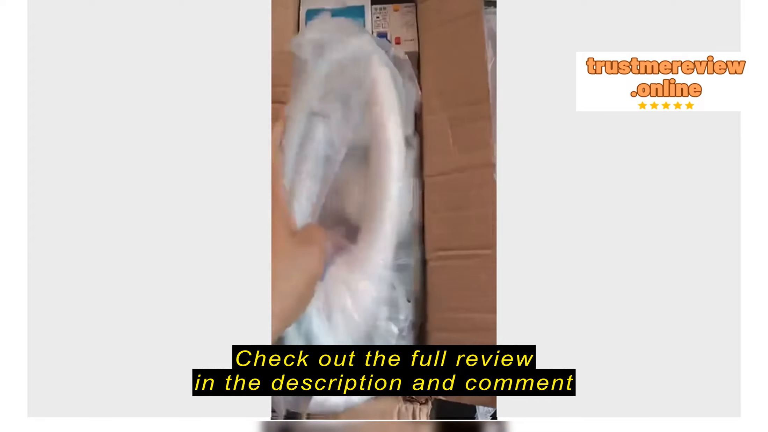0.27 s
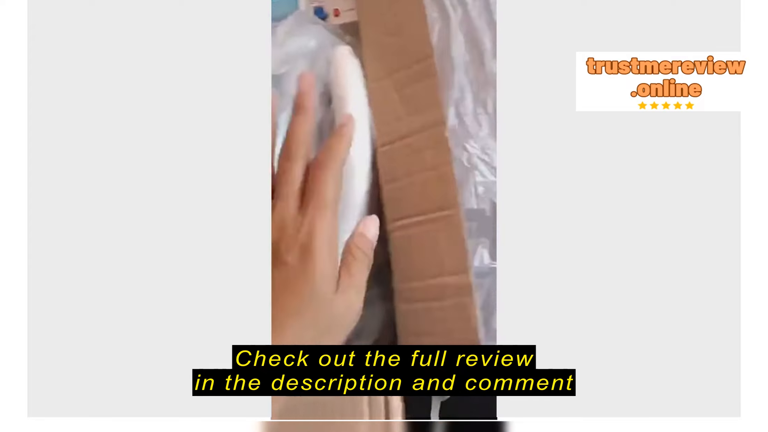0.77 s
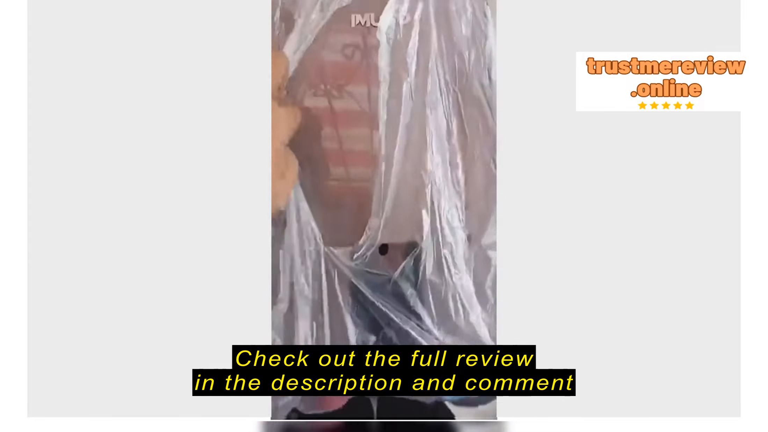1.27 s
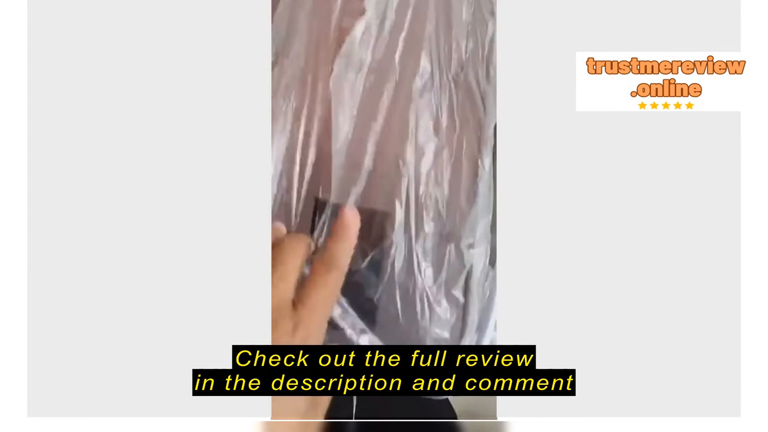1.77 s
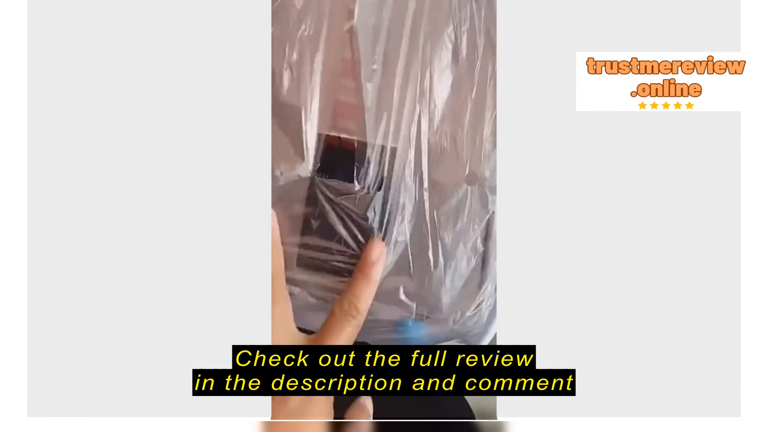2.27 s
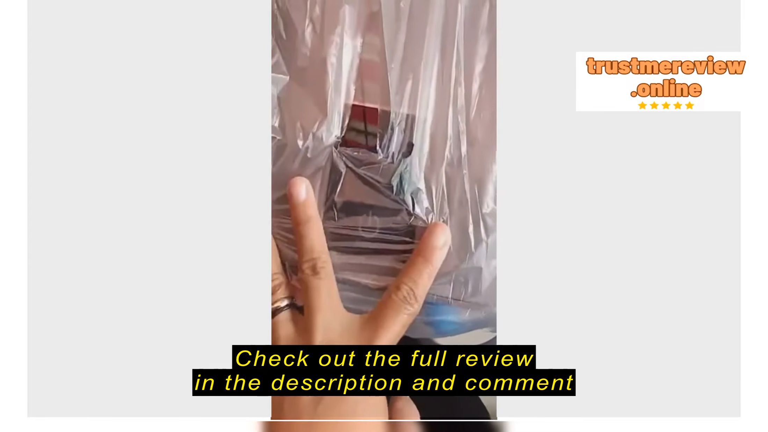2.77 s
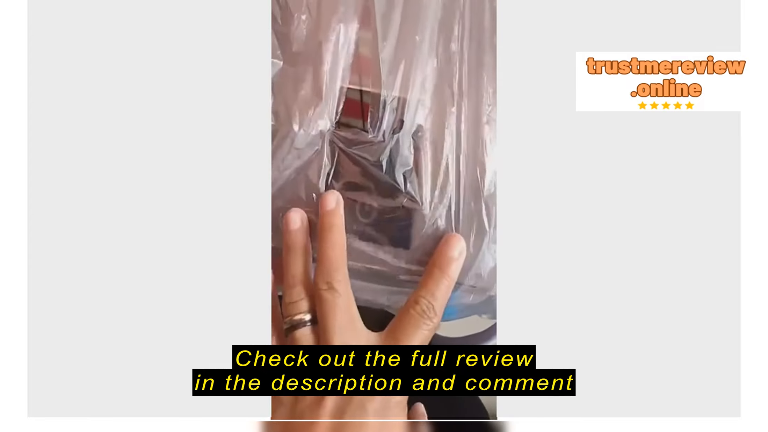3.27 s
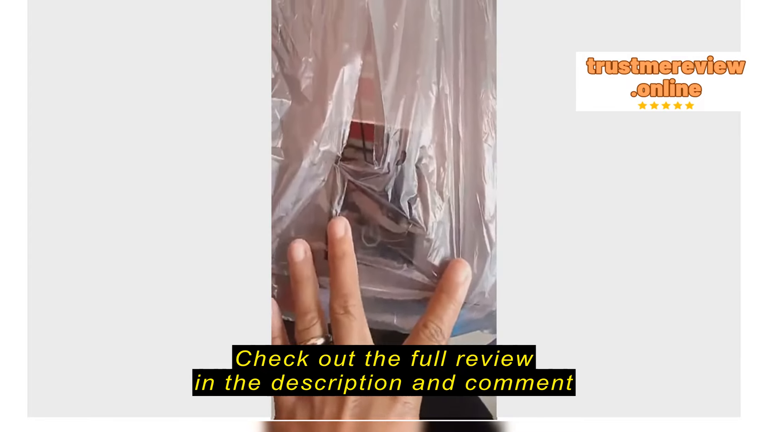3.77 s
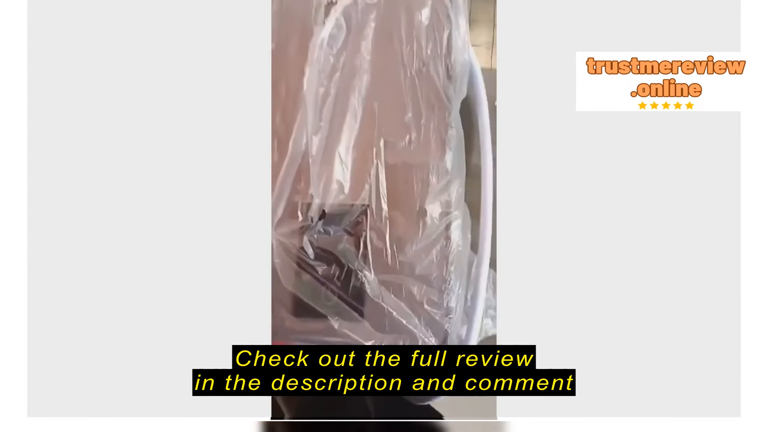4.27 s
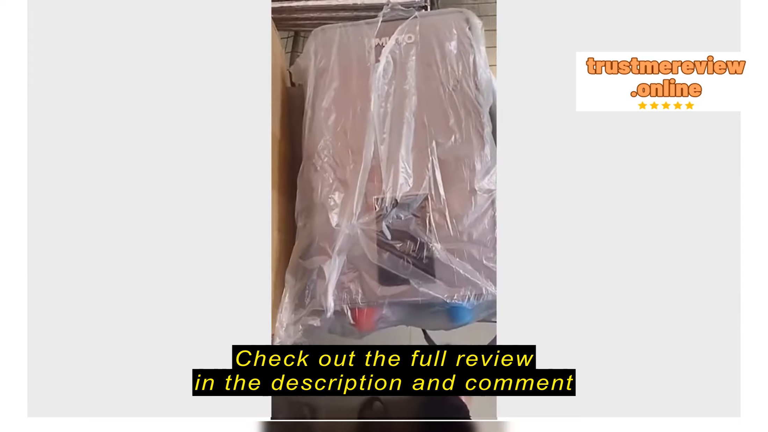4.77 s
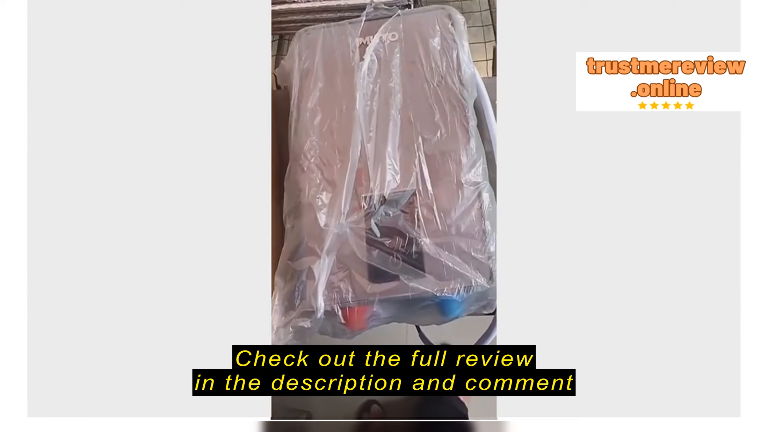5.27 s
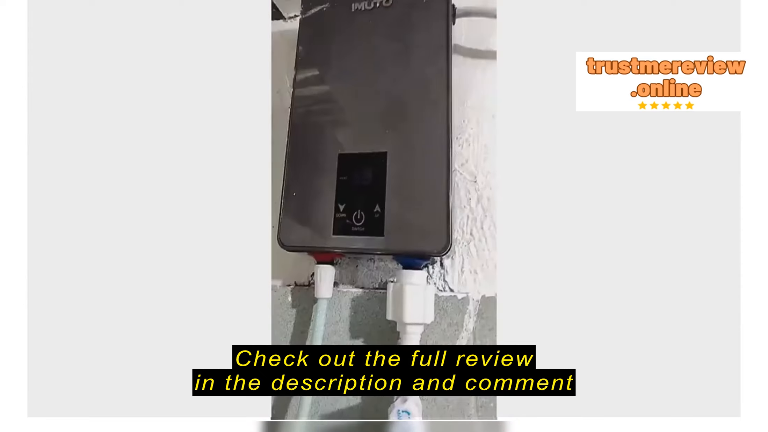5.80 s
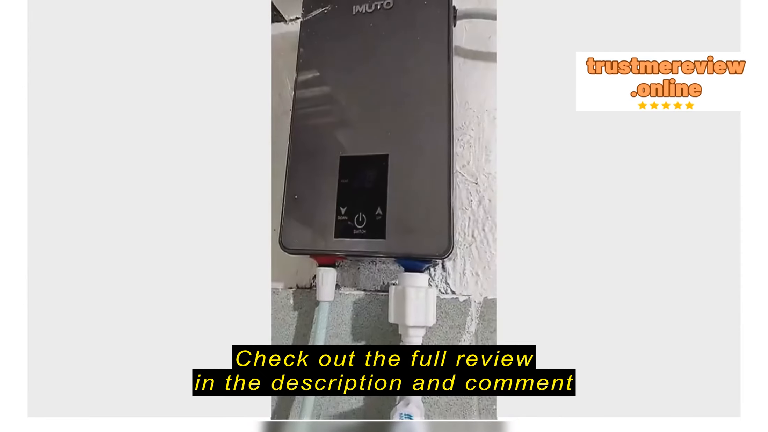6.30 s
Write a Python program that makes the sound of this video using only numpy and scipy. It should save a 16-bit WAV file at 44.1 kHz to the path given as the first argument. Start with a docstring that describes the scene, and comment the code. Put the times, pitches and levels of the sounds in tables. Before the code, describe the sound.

Hands unpack a bagged appliance close to the microphone in a small room. Thin plastic crackles in uneven bursts with sharp snaps, while the carton gives dull knocks and short scrapes early on. Rustling gradually lightens to sparse, bright ticks, with a faint high squeak. One last sharp crackle and snap comes before a short total silence, then only a quiet low hum.

```python
"""Unpacking a bagged appliance

Hands pull a packed appliance from its carton and smooth its thin plastic bag, close by in a small room.
Film: swarms of filtered clicks; snapping creases: short rings with noise cracks; one sine squeak.
Carton: struck damped modes and gripping noise. Rooms: shaped noise; a silent pause, then a quieter hum."""
import sys
import numpy as np
from scipy import signal
from scipy.fft import rfft, irfft
from scipy.io import wavfile
from scipy.ndimage import uniform_filter1d

SR = 44100
rng = np.random.default_rng(int(sys.argv[2]) if len(sys.argv) > 2 else 0)


def persist_wave(psi):
    """Save psi, clipped to +-1, as 16-bit WAV."""
    counts = np.round(np.clip(psi, -1, 1) * 32767).astype(np.int16)
    wavfile.write(sys.argv[1], SR, np.atleast_2d(counts).T)


N = 288414
T = np.arange(N) / SR

# Levels are relative, ahead of layer trims, echoes and filters.
# room murmur spectrum: f/Hz, gain/dB
ROOM_SPECTRUM = [(15, -35.5), (25, -10.5), (54, -6.5), (87, -7), (117, -10), (136, -1), (156, 1), (290, -5),
                 (380, -9), (519, -16), (671, -17), (1500, -33.5), (2100, -39), (3300, -120)]
# quiet room spectrum: f/Hz, gain/dB
QUIET_SPECTRUM = [(30, -40), (75, -28.5), (115, -0.5), (175, -2), (280, -14.5), (370, -13.5), (600, -20),
                  (850, -27), (1400, -26.5), (2200, -33), (5000, -37), (8000, -41.5), (11000, -42),
                  (16000, -61)]
# quiet room hum: t/s, level/dB
QUIET_LEVEL = [(6.06, -57.5), (6.32, -57), (6.46, -61), (6.53, -58)]
# stereo side gain, all but the quiet room and the squeak: f/Hz, gain/dB
WIDTH = [(30, -9), (70, -17), (140, -23), (280, -18), (550, -8), (950, 0)]
# stereo side gain, quiet room: f/Hz, gain/dB
QUIET_WIDTH = [(60, -10.5), (110, -23), (200, -10), (380, -7.5), (700, -1.5), (1290, 1.5), (2380, -1),
               (4400, -1), (8120, 0.5), (15000, 1)]
# pause fade: t/s, gain/1
PAUSE_FADE = [(5.643, 1), (5.66, 0), (6.03, 0), (6.06, 1)]
# cardboard drag spectrum: f/Hz, gain/dB
CARTON_SPECTRUM = [(18, -52.5), (30, -27), (91, -6), (167, -2.5), (241, -3), (323, -3.5), (494, -2),
                   (644, -10), (1000, -16), (1300, -38.5), (2200, -120)]
# damped carton panels: f/Hz, level/dB, t60/s
PANEL_MODES = [(141, -2.5, 0.033), (232, -5.5, 0.033), (385, -8.5, 0.035), (520, -7, .018),
               (829, -2.5, 0.0098), (1220, -1.5, .019), (2150, -2.5, .008)]
# knocks of load and hand on the carton: t/s, level/dB, hardness/Hz (modes above it are barely struck)
KNOCK_EVENTS = [(0.4437, -16, 1900), (.4508, -7, 210), (.460, -17.5, 2000), (.736, -14, 1300),
                (0.7439, -20.5, 500), (.778, -14, 279), (0.912, -22, 249.4), (1.023, -15.5, 170.5),
                (1.0474, -14.5, 3600), (1.053, -21.5, 200), (1.152, -26.5, 800), (1.202, -14.5, 171),
                (5.517, -25.5, 3200)]
# load slides in the carton: t/s, hold/s, level/dB
SLIDE_EVENTS = [(.228, 0.01, -39.5), (0.443, 0.02, -28), (0.5, 0.14, -33), (0.735, .04, -30),
                (0.908, .14, -30.5), (1.15, 0.021, -29.5), (1.245, 0.031, -27.5), (1.328, 0.13, -43),
                (1.70, .22, -46), (2.8, .4, -50), (5.517, .012, -38)]
# fingertip squeak on taut film: t/s, hold/s, level/dB
SQUEAK_EVENT = (4.07, 0.039, -55.5)
# creases that snap: t/s, ring level/dB, f/Hz, left minus right/dB
SNAP_EVENTS = [(0.0748, -16.5, 3480, -8), (0.0825, -13.5, 5990, -0.5), (0.1459, -25, 4400, -23),
               (0.2224, -18, 5800, -7.5), (0.2972, -17.5, 3580, -9), (0.7347, -20, 3070, -8.5),
               (0.9006, -19.5, 5140, 0), (1.1135, -17, 5800, -3), (1.2371, -10.5, 5130, -6),
               (1.3449, -8.5, 2600, -0.5), (1.6664, -20.5, 8480, -4), (1.6935, -19, 4690, -1.5),
               (1.699, -3.5, 4700, -3), (1.7923, -12, 5030, -7.5), (1.8185, -18, 5220, -10),
               (1.883, -4.5, 5400, 5.5), (1.914, -8, 6000, 0.5), (2.3207, -14.5, 3330, -7),
               (2.682, -13, 3000, -5), (2.813, -16.5, 5360, -2), (3.682, -25, 6450, 1),
               (4.1495, -17.5, 7400, 3), (4.2473, -22.5, 13300, -1), (4.358, -23.5, 11500, -3),
               (4.8224, -28, 8490, 3), (4.8543, -23, 6060, 6), (5.131, -29, 13830, 7),
               (5.5155, -5.5, 5500, -9)]
# stray ticks of the relaxing film: start/s, end/s
SETTLING_SPAN = (3.75, 4)
# film colour: f/Hz, gain/dB
FILM_SPECTRUM = [(240, -37), (400, -1), (496, 1), (719, -10.5), (1230, -13), (1790, -13), (2970, -2),
                 (5780, 2.5), (8760, 0), (9760, -4.5), (14400, -4), (15300, -3.5), (16000, -15.5)]
# large folds rolling over: t/s, level/dB, Gaussian sigma/s
ROLL_EVENTS = [(0.586, -33, 0.0077), (0.962, -31, 0.0033), (1.145, -40.5, 0.0084), (1.551, -45, 0.0096),
               (2.473, -51.5, 0.024), (2.815, -41.5, 0.0034), (3.679, -44.5, 0.0026), (4.862, -54, .003)]
# crumpling hand strokes: t/s, hold/s, level/dB, coarseness/dB (+ large folds, - fine creases)
STROKE_EVENTS = [(0.072, 0.0064, -30.5, 5), (0.146, 0.0043, -30, 6.5), (0.225, 0.023, -30.5, 6),
                 (0.298, 0.0041, -33, 8), (0.415, 0.0063, -28.5, 2), (0.452, 0.026, -27.0, 4.0),
                 (0.565, 0.1, -29.0, 3), (0.735, 0.021, -24.5, 5.5), (0.932, 0.046, -27.5, 4.5),
                 (1.132, 0.025, -32, -2), (1.242, 0.028, -22.5, 3.5), (1.431, 0.0089, -31, 3),
                 (1.701, 0.001, -19.5, 3), (1.799, 0.018, -27, 4), (1.889, 0.024, -26, -1),
                 (1.916, 0.016, -23.5, 3.5), (1.997, 0.072, -36.5, -2.5), (2.1, 0.011, -30, 3.5),
                 (2.321, 0.011, -26, 3.5), (2.462, 0.014, -34.5, 3.5), (2.537, 0.11, -38.5, -4),
                 (2.677, 0.016, -30.5, 4), (2.975, 0.0055, -29.5, -3.5), (3.087, 0.023, -27.5, 2),
                 (3.215, 0.0028, -37.5, -6), (3.281, 0.0066, -28, 4.5), (3.602, 0.0083, -43, -8),
                 (3.688, 0.024, -46, -3), (4.14, 0.018, -40.5, -6), (4.19, 0.019, -43.5, -1),
                 (4.291, 0.0095, -45, -5), (4.441, 0.024, -42.5, -4), (4.529, 0.034, -43, -3.5),
                 (4.849, 0.011, -45.5, -7), (5.148, 0.026, -42.5, -4), (5.329, 0.029, -36, -2.5),
                 (5.416, 0.13, -38, -3.5), (5.517, 0.012, -27.5, 6), (5.575, 0.034, -41.5, -1.5)]
# light rustle of the resting hand: t/s, level/dB, coarseness/dB
CONTACT_CURVE = [(0.0, -60.5, 4), (0.05, -43.5, 6), (0.35, -48, 5), (0.39, -36, 8), (0.8, -32.5, -0.5),
                 (0.87, -45, 8), (1.0, -34, 4.5), (1.38, -33.5, 3), (1.61, -52.5, 3), (1.69, -52.5, 10),
                 (1.73, -38.5, 2), (2.21, -45, -2), (2.78, -42, 1), (2.9, -39, -1), (3.35, -38.5, 0),
                 (3.41, -47, 0.5), (3.58, -47, -2.5), (3.88, -57.5, 3), (4.16, -55, 5), (4.34, -57.5, 2),
                 (4.7, -52.5, -2), (4.95, -51.5, 4), (5.02, -59.5, 7), (5.64, -54, 9)]

SQUEAK_HZ, TOP_HZ = 7330, 15800
# stroke time constants; the swell is that of a typical hold
SWELL_S, TYPICAL_HOLD_S, RELEASE_S = 0.014, 0.016, 0.027
# band level change per dB of coarseness
LARGE_GROWTH, FINE_LOSS = 1, 0.91


def undb(db):
    """Decibels to gain."""
    return 10 ** (np.asarray(db) / 20)


def curves(rows):
    """Each column of a table, joined by straight lines in time."""
    s, *columns = np.transpose(rows)
    return [np.interp(T, s, column) for column in columns]


def unit(x):
    """Scale a stereo pair so that its middle has rms 1."""
    return x / np.sqrt(np.mean(x.mean(axis=0) ** 2))


def shape(x, gain_at):
    """Filter by a gain that is a function of frequency."""
    size = x.shape[-1]
    hz = np.maximum(np.fft.rfftfreq(size, 1 / SR), 1)
    return irfft(rfft(x) * gain_at(hz), size)


def colour(x, points):
    """Filter by (f/Hz, gain/dB) points, interpolated over log frequency."""
    hz, db = np.transpose(points)
    return shape(x, lambda f: undb(np.interp(np.log(f), np.log(hz), db)))


def band(x, lo_hz, hi_hz, order=2):
    """Causal band-pass."""
    edges_hz = [lo_hz, min(hi_hz, SR / 2 - 2000)]
    sos = signal.butter(order, edges_hz, "band", fs=SR, output="sos")
    return signal.sosfilt(sos, x + 1e-18)


def narrow(x, width):
    """Long waves reach both microphones alike: weigh the side signal by frequency."""
    mid = (x[0] + x[1]) / 2
    side = colour((x[0] - x[1]) / 2, width)
    return np.array([mid + side, mid - side])


def air(width):
    """Diffuse stereo noise."""
    return narrow(rng.standard_normal((2, N)), width)


def pan(left_minus_right_db):
    """Column of left and right gains."""
    return undb(np.array([[left_minus_right_db], [-left_minus_right_db]]) / 2)


def add(out, s, sound):
    """Mix a short sound in at time s."""
    start = int(s * SR)
    out[:, start:start + sound.shape[-1]] += sound[..., :N - start]


def decay(t, t60_s):
    """Exponential fall of 60 dB in t60_s."""
    return np.exp(-np.log(1000) * t / t60_s)


def echo(x, t60_s):
    """Dense reflections from carton, floor and walls, drawn anew per call and microphone."""
    t = T[:SR // 8]
    onset = np.minimum(t / 0.004, 1)
    tail = rng.standard_normal((2, len(t))) * decay(t, t60_s) * onset
    tail /= np.sqrt(np.sum(tail ** 2, axis=1, keepdims=True))
    return signal.oaconvolve(x, tail, axes=1)[:, :x.shape[1]]


def gesture(s, hold_s, swell_s, release_s):
    """Swell up to time s, hold, die away; longer gestures swell more slowly."""
    rise_s = swell_s * np.sqrt(abs(hold_s) / TYPICAL_HOLD_S)
    before = np.minimum(T - s, 0) / rise_s
    after = np.maximum(T - s - hold_s, 0) / release_s
    return np.exp(np.maximum(before - after, -30))


def room(level_db=-51.5):
    """Low murmur: diffuse noise shaped by the room spectrum."""
    return undb(level_db) * unit(colour(air(WIDTH), ROOM_SPECTRUM))


def quiet_room():
    """Quiet hum: diffuse shaped noise on a slow level curve."""
    return unit(colour(air(QUIET_WIDTH), QUIET_SPECTRUM)) * undb(curves(QUIET_LEVEL)[0])


def handling():
    """Crumpling level/dB and coarseness/dB: strokes add their power to that of the resting hand."""
    rest_db, rest_coarse_db = curves(CONTACT_CURVE)
    power = undb(rest_db) ** 2
    weighted_coarse = power * rest_coarse_db
    for s, hold_s, db, coarse_db in STROKE_EVENTS:
        stroke_power = (undb(db) * gesture(s, hold_s, SWELL_S, RELEASE_S)) ** 2
        power = power + stroke_power
        weighted_coarse = weighted_coarse + stroke_power * coarse_db
    return 10 * np.log10(power), weighted_coarse / power


def drag(hand_db, push_db=-19, drag_db=-4, grip_db=3.0, grip_per_s=70):
    """The load drags over cardboard in uneven grips: shaped noise, randomly modulated."""
    grips = np.interp(T * grip_per_s, np.arange(2000), rng.standard_normal(2000))
    slide_power = sum((undb(db) * gesture(s, hold_s, swell_s=0.007, release_s=0.046)) ** 2
                      for s, hold_s, db in SLIDE_EVENTS)
    # the load also shifts a little under every stroke
    level = np.sqrt(slide_power + undb(hand_db + push_db) ** 2)
    scrape = unit(colour(air(WIDTH) * undb(grip_db * grips), CARTON_SPECTRUM))
    return scrape * level * undb(drag_db)


def knocks(knock_db=1.0, scuff_db=-11.0206, lowest_hz=72, pan_db=5, echo_db=-11, echo_t60_s=0.15):
    """Blows ring heavily damped panels, each one pitch with fibres scuffing around it."""
    out, t = np.zeros((2, N)), T[:SR // 8]
    for s, db, hard_hz in KNOCK_EVENTS:
        for k, (hz, mode_db, t60_s) in enumerate(PANEL_MODES):
            scuff = unit(band(rng.standard_normal((2, len(t))), hz / 2, hz * 2))
            tone = (-1) ** k * np.sin(2 * np.pi * hz * t)
            ring = (tone + undb(scuff_db) * scuff) * decay(t, t60_s)
            softness = np.sqrt(1 + (hz / hard_hz) ** 4)
            add(out, s, undb(db + mode_db + knock_db) * ring / softness)
    # the knocks carry no deepest bass
    out = band(out, lowest_hz, 12000)
    out = out * pan(pan_db)
    return narrow(out + undb(echo_db) * echo(out, echo_t60_s), WIDTH)


def squeak(waver_hz=25):
    """Skin sticks and slips on the film: a thin, slightly unsteady sine whistle."""
    s, hold_s, db = SQUEAK_EVENT
    waver = np.interp(T * 100, np.arange(700), rng.standard_normal(700))
    phase = 2 * np.pi * np.cumsum(SQUEAK_HZ + waver_hz * waver) / SR
    whistle = np.sqrt(2) * np.sin(phase)
    return whistle * undb(db) * gesture(s, hold_s, swell_s=0.08, release_s=0.028)


def stray_ticks(count=10, tick_db=-33.5, spread_db=7, lo_hz=6000, hi_hz=13000):
    """Faint snaps of the settling film, one at random in each equal slot; columns of SNAP_EVENTS."""
    start_s, end_s = SETTLING_SPAN
    rows = []
    for k, (when, size, pitch) in enumerate(rng.random((count, 3))):
        s = start_s + (end_s - start_s) * (k + when) / count
        rows.append((s, tick_db + spread_db * (size - 0.5), lo_hz + (hi_hz - lo_hz) * pitch, 0))
    return rows


def snaps(ring_cycles=1.0, crack_db=-6.0, crack_s=0.0023, echo_db=-8.5, echo_t60_s=0.12):
    """A crease flips: a short ring at its pitch, a broad crack as it runs along the film, then echo."""
    out, t = np.zeros((2, N)), T[:SR // 6]
    for s, db, hz, pan_db in SNAP_EVENTS + stray_ticks():
        cycles = t * hz / ring_cycles
        phase = 2 * np.pi * (hz * t + rng.random((2, 1)) / 2)
        ring = cycles * np.exp(1 - cycles) * np.sin(phase)
        crack = band(rng.standard_normal((2, len(t))), hz / 1.8, hz * 5.4, order=1) * np.exp(-t / crack_s)
        click = undb(db) * pan(pan_db) * (ring + undb(crack_db) * crack)
        add(out, s + 0.0006, click + undb(echo_db) * echo(click, echo_t60_s))
    return out


def holding(dip_db=-2.5, hold_s=0.035):
    """Just before a listed snap the taut film holds still, so the rustle dips (dB)."""
    dip, t = np.zeros(N), T[:SR // 20]
    for s, *_ in SNAP_EVENTS:
        end = int(s * SR)
        before = slice(end - len(t), end)
        dip[before] = np.maximum(dip[before], np.exp(-t[::-1] / hold_s))
    return dip_db * dip


def buckles(per_s, spread_db, largest_spreads):
    """Random clicks, mostly tiny and a few large, each with its own stereo balance and lag."""
    draw = rng.random((12000, 5))[:int(min(per_s * N / SR, 12000))]
    at = (draw[:, 0] * (N - 40)).astype(int) + 20
    size_db = spread_db * np.minimum(-np.log(1 - draw[:, 1]), largest_spreads)
    size = undb(size_db) * np.sign(draw[:, 2] - 0.5)
    lag = (24 * (draw[:, 3] - 0.5)).astype(int)  # samples
    out = np.zeros((2, N))
    out[0, at] = size * np.sqrt(draw[:, 4])
    out[1, at + lag] = size * np.sqrt(1 - draw[:, 4])
    return out


def swarm(per_s, spread_db, largest_spreads, echo_db, echo_t60_s):
    """Buckling folds of five sizes: each rings a cycle or two, the smaller the higher."""
    total = np.zeros((2, N))
    for hz in (1200, 2600, 4500, 7500, 12000):
        folds = band(buckles(per_s, spread_db, largest_spreads), hz / 2, hz * 2, order=1)
        total += folds + undb(echo_db) * echo(folds, echo_t60_s)
    return colour(total, FILM_SPECTRUM)


def tone_ripple(x):
    """Random, slowly shifting ripple of tone over frequency and time, deepest at low pitch."""
    hz, _, frames = signal.stft(x, SR, nperseg=512)
    ripple = rng.standard_normal(frames.shape[1:])
    ripple = uniform_filter1d(ripple, size=2, axis=0)  # over frequency
    ripple = uniform_filter1d(ripple, size=9, axis=1)  # over time
    depth_db = 1.5 + 2.2 / (1 + (hz[:, None] / 3500) ** 2)
    return signal.istft(frames * undb(depth_db * ripple / ripple.std()))[1][:, :N]


def rolls(rush):
    """A rolling fold is the same crackle, duller, swelling and fading within a moment."""
    level = sum(undb(db) * np.exp(-((T - s) / sigma_s) ** 2 / 2) for s, db, sigma_s in ROLL_EVENTS)
    swapped = rush[::-1]  # left and right exchanged
    dull = shape(swapped, lambda f: f ** 2 / (f ** 2 + 350 ** 2) / np.hypot(f, 1400) ** 2.6)
    return unit(dull) * level


def crinkle(level_db, coarse_db, large_db=-13, middle_db=-2.5, fine_db=-1.94, firm_db=-44, soft_knee_db=4):
    """A firm hand buckles folds in a dense rush; a resting hand lets them tick one by one."""
    rush = swarm(per_s=560, spread_db=4.0, largest_spreads=3.7, echo_db=2.0, echo_t60_s=0.11)
    rush = unit(tone_ripple(rush))
    ticks = unit(swarm(per_s=270, spread_db=4.0, largest_spreads=3.4, echo_db=1, echo_t60_s=0.032))
    firm = 1 / (1 + np.exp((firm_db - level_db) / soft_knee_db))
    film = np.sqrt(firm) * rush + np.sqrt(1 - firm) * ticks
    # large folds sound low, fine creases high; the bands overlap
    large = shape(film, lambda f: 1 / (1 + (f / 2200) ** 4) / (1 + (650 / f) ** 4))
    middle = shape(film, lambda f: 1 / (1 + (2200 / f) ** 5) / (1 + (f / 9200) ** 12))
    fine = shape(film, lambda f: 1 / (1 + (9200 / f) ** 12))
    rustle = unit(large) * undb(large_db + LARGE_GROWTH * coarse_db)
    rustle = rustle + unit(middle) * undb(middle_db)
    rustle = rustle + unit(fine) * undb(fine_db - FINE_LOSS * coarse_db)
    return rustle * undb(level_db + holding()) + rolls(rush)


def scene():
    """Unpacking over a low room murmur, a pause, then the quiet room."""
    hand_db, coarse_db = handling()
    carton = drag(hand_db) + knocks()
    bag = narrow(crinkle(hand_db, coarse_db) + snaps(), WIDTH) + squeak()
    unpacking = room() + carton + bag
    quiet_start_s = PAUSE_FADE[2][0]
    return np.where(T < quiet_start_s, unpacking, quiet_room()) * curves(PAUSE_FADE)[0]


def record(dry, notch_hz=9700, notch_width_hz=450, notch_db=-4):
    """A narrow dip in the treble near 9.7 kHz; peaks are rounded and the top is cut steeply."""
    heard = shape(dry, lambda f: undb(notch_db * np.exp(-((f - notch_hz) / notch_width_hz) ** 2)))
    heard = heard / (1 + (heard / 0.75) ** 4) ** 0.25
    top_cut = signal.ellip(10, 0.2, 80, TOP_HZ, fs=SR, output="sos")
    return signal.sosfilt(top_cut, heard)


dry = scene()
out = record(dry)
persist_wave(out)
```